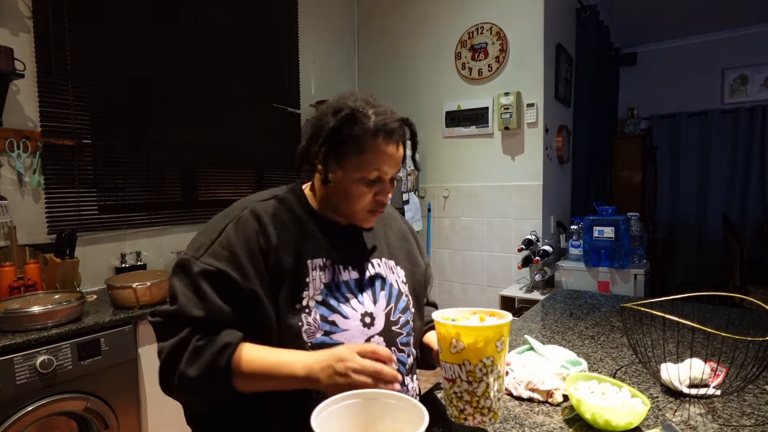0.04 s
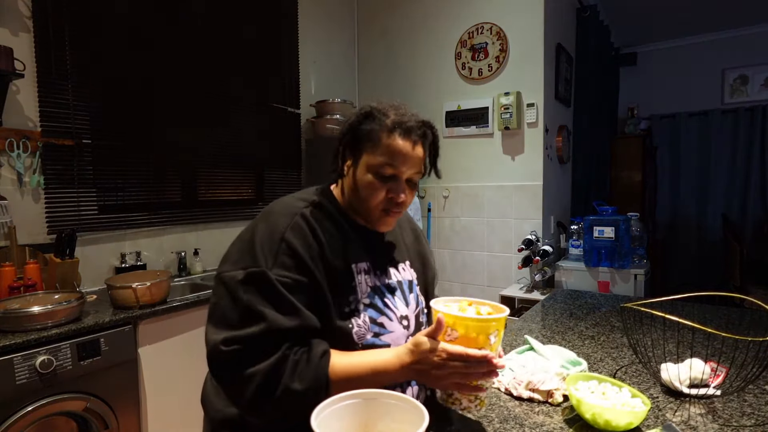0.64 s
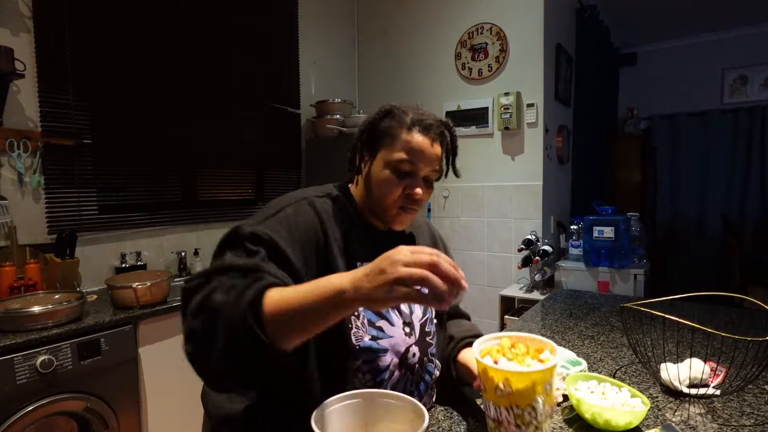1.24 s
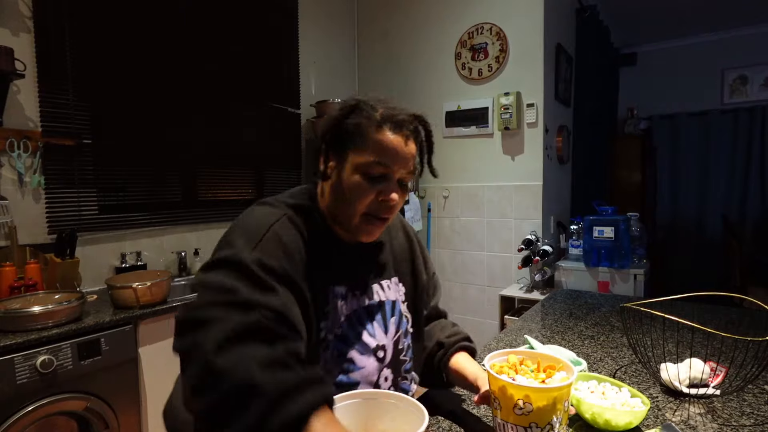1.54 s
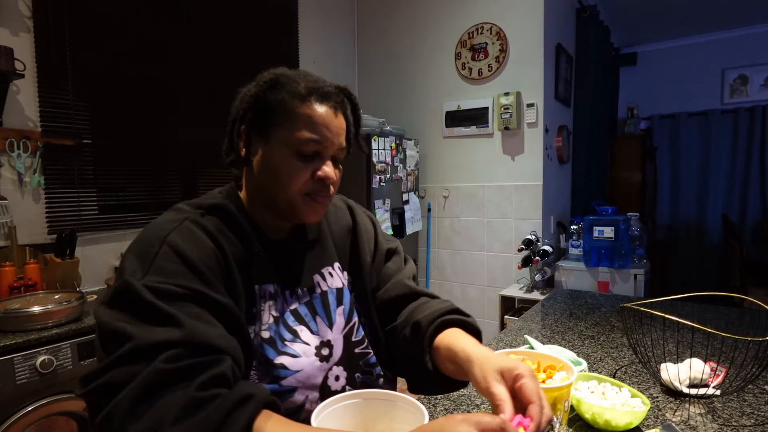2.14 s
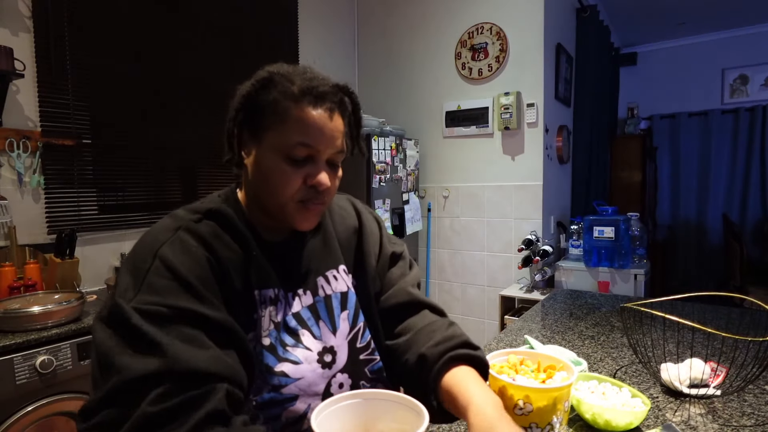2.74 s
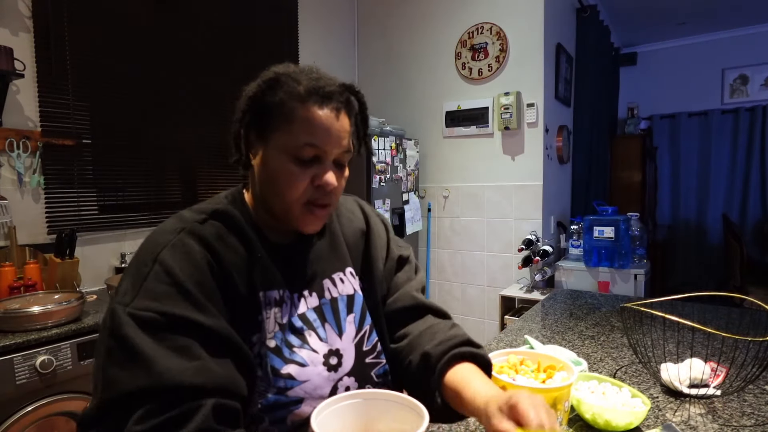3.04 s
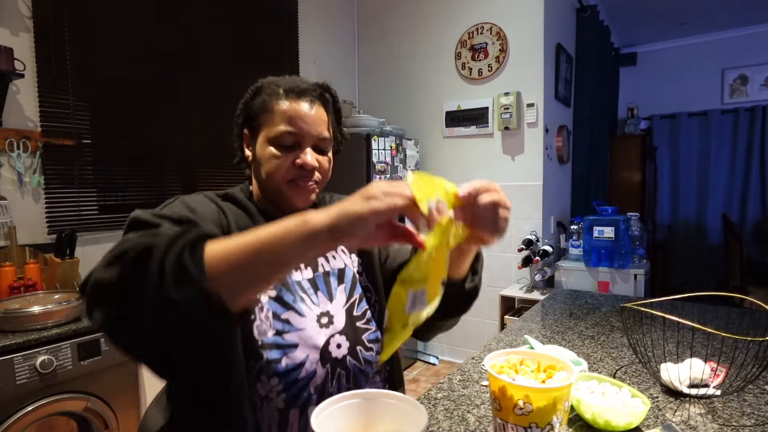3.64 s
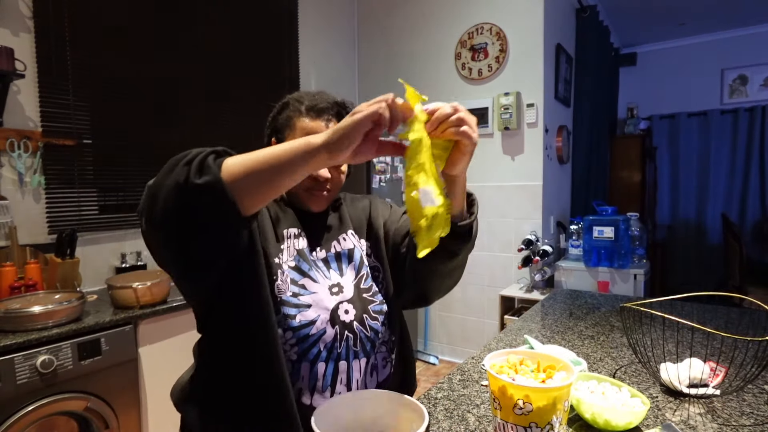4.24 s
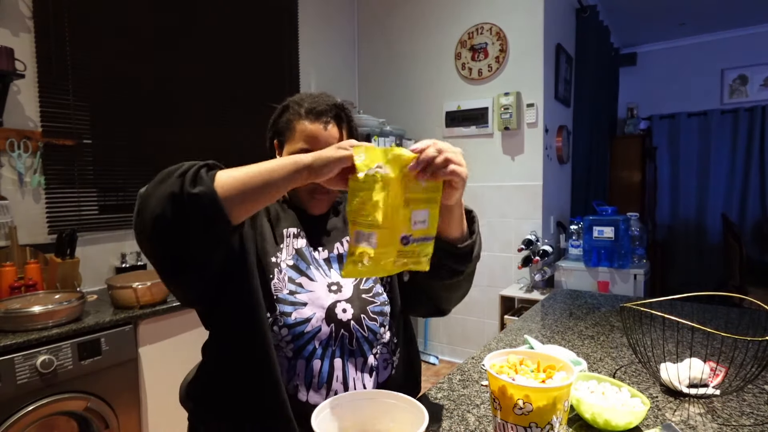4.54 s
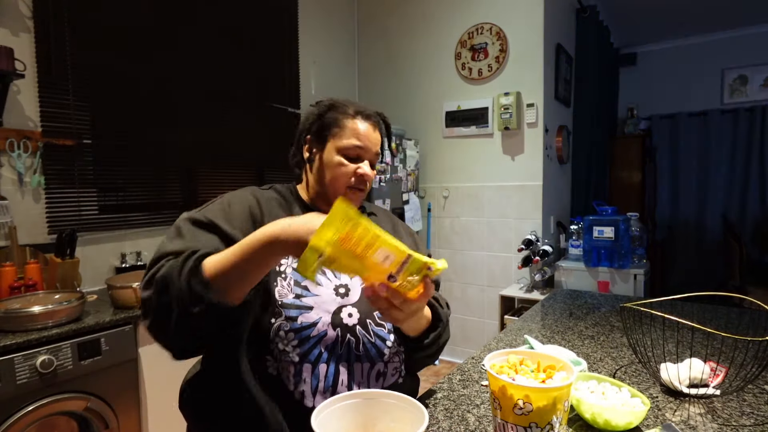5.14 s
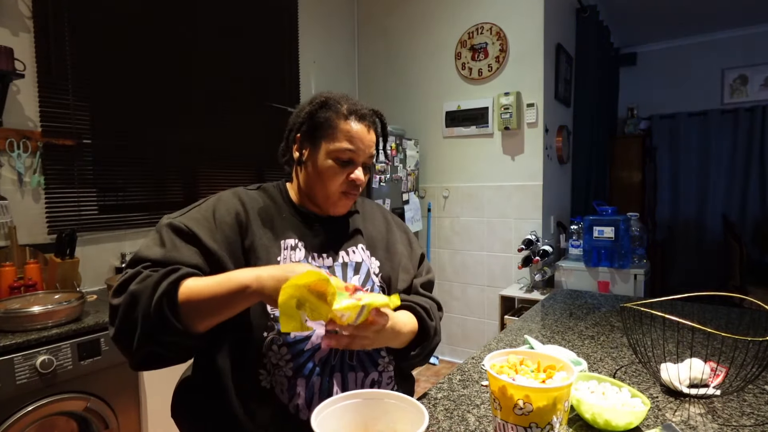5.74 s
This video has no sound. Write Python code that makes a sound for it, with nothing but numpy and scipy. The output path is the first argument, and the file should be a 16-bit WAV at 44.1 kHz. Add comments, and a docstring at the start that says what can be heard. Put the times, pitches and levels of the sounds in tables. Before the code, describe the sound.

Light, crisp pieces rattle against a hollow tub, which then knocks and taps down on a kitchen counter. Hands take up a plastic snack packet: uneven rustling and snapping creases, one more knock on the tub, a brief bright tear, and continued crinkling as the packet is scrunched. The microphone is about an arm's length away in a small, slightly reflective room with faint background air.

```python
"""Kitchen counter, small tiled room: a tub of crisp snacks is shaken and set down, then plastic
packets are handled and one is torn open and crushed. Film creases buckle in sharp snaps over a fine
crackle; rips are runs of tiny ruptures. Dry pieces shower against the tub; knocks ring its hollow
modes. The room adds reflections, a short tail and faint steady air."""
import sys
import numpy as np
from scipy import signal
from scipy.fft import rfft, irfft
from scipy.io import wavfile

SR = 44100
rng = np.random.default_rng(int(sys.argv[2]) if len(sys.argv) > 2 else 0)


def file_out(sig):
    """Save sig as 16-bit WAV at sys.argv[1]."""
    # one column per channel
    cols = np.atleast_2d(sig).T
    # limit, then scale
    lim = np.clip(cols, -1, 1)
    pcm = np.round(lim * 32767).astype(np.int16)
    wavfile.write(sys.argv[1], SR, pcm)


N = 254898
T = np.arange(N) / SR

# big creases snapping through: (time [s], relative level [dB], pitch [Hz], decay [s])
CREASE_SNAPS = [(1.6629, -9, 3440, 0.0014), (1.81, -5.5, 4500, 0.0014), (1.9645, -9.5, 3860, 0.0042),
                (1.9804, -33, 4360, 0.0036), (2.1951, -13, 3160, 0.0014), (2.3093, -4.5, 4140, 0.0072),
                (2.359, -9, 3140, 0.003), (2.3888, -13, 3270, 0.0016), (2.4189, -3.5, 3180, 0.0016),
                (2.5462, -6, 4700, 0.0017), (2.562, -7, 3270, 0.0042), (2.6368, -1.5, 4900, 0.0033),
                (2.834, -4.5, 4610, 0.0037), (2.86, -6, 4770, 0.002), (2.8664, 1.5, 2900, 0.0072),
                (2.8772, 1.5, 3250, 0.0015), (2.917, -8, 3060, 0.0024), (2.9985, 1.5, 2910, 0.0032),
                (3.0839, 3, 7650, 0.0042), (3.1152, 0, 6980, 0.0024), (3.1277, -18, 4560, 0.0029),
                (3.1845, -2, 4840, 0.0038), (3.3097, -5, 4800, 0.0015), (3.3489, -8.5, 3570, 0.0012),
                (3.4062, -3, 3430, 0.0024), (3.4452, -6, 7000, 0.0021), (3.4677, -5.5, 3650, 0.0024),
                (3.4946, -8, 3800, 0.0024), (3.717, -10.5, 4750, 0.0024), (3.7368, -6.5, 4150, 0.003),
                (3.9011, -3, 6460, 0.0018), (4.0054, -3.5, 5050, 0.0014), (4.0203, -7, 4500, 0.003),
                (4.1775, -16, 4700, 0.0024), (4.2283, -11, 4540, 0.0015), (4.3196, -8.5, 7500, 0.0024),
                (4.3275, -1, 3470, 0.0017), (4.3658, -2, 4560, 0.0018), (4.6098, -13, 3060, 0.0026),
                (4.777, -13, 2900, 0.00097), (4.805, -8, 2920, 0.0008), (4.8894, -6, 3010, 0.0011),
                (4.9764, -4.5, 3270, 0.0008), (5.0533, -2.5, 3900, 0.0011), (5.1172, -1, 3160, 0.0008),
                (5.1254, -6, 4100, 0.0048), (5.142, -7, 3190, 0.0024), (5.3492, 3.5, 3930, 0.0018),
                (5.3841, -2, 3970, 0.0024), (5.415, -8, 4040, 0.003), (5.474, 3, 4040, 0.0018),
                (5.5139, -11.5, 4860, 0.0034), (5.563, -13, 3280, 0.0035), (5.5842, -1.5, 3300, 0.0046),
                (5.6624, -3, 6360, 0.0063), (5.7395, 1.5, 3200, 0.0019)]
# hands pressing the film: (time [s], hold [s], relative level [dB], fine-crease offset [dB])
HAND_GRIPS = [(1.61, 0.079, -45, -9), (1.665, .32, -34.5, -1), (1.72, 0.15, -34, -10),
              (1.815, 0.062, -33, 3), (2.142, 0.51, -39, -25), (2.307, 0.0067, -39, 14),
              (2.548, 0.021, -23, 2), (2.603, .46, -29.5, 4), (2.857, .035, -30, 9), (3.08, 0.16, -35, 4),
              (3.363, 0.33, -37.5, 6), (3.37, 0.16, -37.5, 2), (3.606, 0.029, -36, 3),
              (3.716, 0.12, -33.5, 3), (3.892, 0.0094, -28.5, -1), (3.988, 0.062, -29.5, -1),
              (4.072, .21, -40.5, 8), (4.315, 0.067, -30.5, -1), (4.411, 0.23, -32, -1.5),
              (4.645, .31, -43.5, -13), (4.978, 0.32, -34.5, 7.5), (5.04, 0.096, -34.5, -5),
              (5.122, 0.025, -26, -1), (5.286, 0.25, -31, -2), (5.324, 0.19, -27, 3),
              (5.55, 0.18, -28.5, 2.5), (5.732, 0.05, -26, 8)]
# film ripping or sliding fast: (time [s], level [dB], rise [s], fall [s], pitch [Hz])
FILM_RIPS = [(3.084, -25, 0.0037, 0.051, 7300), (3.112, -22, 0.018, 0.06, 7000),
             (4.638, -22.5, 0.0069, 0.0074, 10000)]
# snacks sliding and landing: (time [s], level [dB], rise [s])
TUB_SHAKES = [(0, -41.5, .001), (0.083, -39, 0.023), (0.191, -36, .0033), (0.239, -29.5, .035),
              (0.471, -37.5, .0026), (0.547, -21, 0.012), (.67, -39, 0.023), (0.732, -25.5, 0.016),
              (0.917, -19.5, 0.011), (1.095, -37.5, 0.022), (1.216, -39.5, 0.0024), (1.359, -31, 0.0084)]
# single pieces on the tub wall: (time [s], level over 1 ms [dB], pitch [Hz], decay [s])
PIECE_HITS = [(.0922, -27, 2570, 0.00059), (.1012, -27.5, 2740, 0.0013), (.2801, -15, 2700, .0019),
              (.5596, -13, 2780, 0.0017), (.5699, -20, 2780, 0.0011), (.5861, -11, 1750, 0.0018),
              (.696, -26, 2780, .00074), (.7567, -14, 2320, .0017), (.9235, -11.5, 2400, 0.0033),
              (.9385, -9.5, 2420, 0.0023)]
# knocks on the tub: (time [s], level over 1 ms [dB], pitch of struck part [Hz], spread [octaves])
TUB_KNOCKS = [(0.344, -15.5, 890, 0.85), (.382, -24.5, 1220, 0.24), (0.4, -33, 900, 0.48),
              (0.4853, -14.5, 1060, 1), (0.505, -16.5, 1170, 0.53), (0.489, -23.5, 207, 0.37),
              (1.3574, -8.5, 450, 0.53), (1.3568, -12.5, 1570, 1.04), (1.377, -13.5, 480, 0.57),
              (1.445, -18, 490, 0.7), (1.4905, -17.5, 3660, 0.83), (1.4943, -8, 3800, 0.28),
              (1.502, -17, 3120, 0.6), (1.504, -25.5, 850, 0.24), (2.7515, -13.5, 845, 0.59),
              (2.861, -20.5, 320, 0.68)]
# tub modes: (frequency [Hz], relative level [dB], t60 [s])
TUB_MODES = [(173, -9, 0.12), (244.6, -8.5, 0.2), (294, -3, 0.074), (396, 0, 0.062), (436.6, -6.5, 0.15),
             (524, 2.5, 0.024), (717, 1, 0.038), (850, 5.5, 0.021), (1174, 6.5, 0.022), (1310, 3, 0.02),
             (1544, 6, 0.018), (1956, 3, 0.034), (2390, 8, 0.013), (2940, 6.5, 0.01), (3810, 20, 0.006)]
# kitchen tail: (frequency [Hz], t60 [s], level [dB])
TAIL_BANDS = [(122, 1, -18), (384, 0.48, -5), (940, 0.59, -11.5), (2940, 0.39, -11), (7840, 0.43, -6.5),
              (14000, 0.22, -7.5)]
# nearby surfaces: (delay [s], level [dB])
REFLECTIONS = [(.0092, -24), (0.0115, -20.5)]

# spectra: (frequency [Hz], gain [dB])
CRACKLE_EQ = [(100, -27), (300, -28), (800, -7.5), (1500, 1.5), (2500, 2.5), (4200, 0.5), (5500, -7),
              (9000, -11), (16000, -39)]
FINE_CREASE_EQ = [(1500, -15), (4000, 11), (7000, 3), (10000, 2.5), (13000, 1), (16000, -2)]
PANEL_EQ = [(40, -29), (100, 1.5), (220, -5), (330, 1), (520, -2), (760, 3.5), (1200, 0.5), (3000, -20.5)]
CRUSHED_EQ = [(100, -8), (450, -3), (900, 2.5), (1600, 1), (3000, -0.5), (8000, -1.5), (15000, 1)]  # smaller panels ring higher
SHOWER_EQ = [(60, -26), (200, -14), (430, -2.5), (900, -3.5), (1800, -0.5), (3000, 1), (4500, -4),
             (7000, -14), (12000, -14), (16000, -20)]
AIR_EQ = [(20, -30), (45, -21), (65, -4), (110, 2), (330, -3), (1100, -0.5), (3000, -4), (6000, -6.5),
          (16000, -18)]
RADIATION_EQ = [(50, -12.0), (300, 3.5)]  # thin film radiates little bass
TUB_SEND_EQ = [(1800, 6.5), (3600, -2.5)]  # rim faces the listener: less treble to the walls
TAIL_SIDE_EQ = [(100, -11), (500, -8.5), (2000, 1), (4500, 4.5), (14000, 0.5)]
AIR_SIDE_EQ = [(100, -10), (2000, -8)]


def packet():
    """Small creases crackle under the hands, panels flex, big creases snap."""
    effort, fine_effort = hands()
    crackle = unit(colour(grains(rate_hz=480, spread_db=1, decay_s=0.0023), CRACKLE_EQ))
    fine = unit(colour(grains(rate_hz=300, spread_db=5.5, decay_s=0.0015), FINE_CREASE_EQ))
    flex = unit(colour(grains(rate_hz=350, spread_db=5.5, decay_s=0.0065), PANEL_EQ))
    strays = stray_creases(rate_hz=120, centre_hz=2850, octaves=0.95, spread_db=21, mean_decay_s=0.0015)
    pops = unit(clicks(strays, ring_ratio=1.12, crack_db=-1.5, crack_share=0.37, crack_ratio=1.48,
                       size=512))
    rustle = effort * (undb(-5.5) * crackle + undb(-3.5) * pops + undb(-12) * flex)
    rustle += fine_effort * undb(-12.5) * fine
    creases = np.vstack([CREASE_SNAPS, second_steps(CREASE_SNAPS)])
    snaps = clicks(creases, ring_ratio=1.22, crack_db=3, crack_share=0.2, crack_ratio=1.77)
    film = colour(rustle + undb(-13) * snaps, RADIATION_EQ)
    crushed = np.interp(T, [4.5, 5.0], [0, 1])
    return (1 - crushed) * film + crushed * colour(film, CRUSHED_EQ)


def hands(attack_s=0.0042, release_s=0.032):
    """Rustle and fine-crease envelopes: film takes load, then relaxes. Grips add in power."""
    power, fine_power = np.zeros((2, N))
    for time_s, hold_s, db, fine_db in HAND_GRIPS:
        attack = np.clip((T - time_s) / attack_s, 0, 1)
        release = np.exp(-np.maximum(T - time_s - hold_s, 0) / release_s)
        grip = undb(db) * attack * release
        power += grip ** 2
        fine_power += (undb(fine_db) * grip) ** 2
    return np.sqrt(power), np.sqrt(fine_power)


def stray_creases(rate_hz, centre_hz, octaves, spread_db, mean_decay_s):
    """Click rows for mid-size creases: random time, level, pitch and decay."""
    moment, softness, pitch, length = rng.random((int(rate_hz * N / SR), 4)).T
    hz = centre_hz * 2 ** (octaves * (2 * pitch - 1))
    return np.column_stack([moment * N / SR, -spread_db * softness, hz, mean_decay_s * (0.5 + length)])


def second_steps(creases, gap_s=0.0018, drop_db=7.5):
    """A big crease yields in two steps; rows for the second: later, weaker, detuned."""
    time_s, db, hz, decay_s = np.transpose(creases)
    wait, detune = rng.random((len(time_s), 2)).T
    later_s = time_s + gap_s * (0.5 + wait)
    return np.column_stack([later_s, db - drop_db, hz * 2 ** (detune - 0.5), decay_s])


def rips():
    """Fast runs of tiny, bright ruptures."""
    out, bins_hz = np.zeros(N), np.fft.rfftfreq(N, 1 / SR)
    ruptures = rfft(grains(rate_hz=2500, spread_db=4, decay_s=0.0004, size=64))
    for time_s, db, rise_s, fall_s, hz in FILM_RIPS:
        tear = unit(irfft(ruptures * bell(bins_hz, hz, octaves=0.79), N))
        out += undb(db) * swell(time_s, rise_s, fall_s) * tear
    return out


def snacks(settle_s=0.048):
    """Each shake throws light, dry pieces against the tub."""
    shower = unit(colour(grains(rate_hz=2200, spread_db=6, decay_s=0.0011), SHOWER_EQ))
    flow = sum(undb(db) * swell(time_s, rise_s, settle_s) for time_s, db, rise_s in TUB_SHAKES)
    hits = clicks(PIECE_HITS, ring_ratio=1.3, crack_db=3, crack_share=0.7, crack_ratio=1.2)
    return flow * shower + hits


def tub():
    """Base blows ring the low modes, rim taps the high ones; each starts with a contact tick."""
    out, t = np.zeros(N), np.arange(512) / SR
    mode_hz, mode_db, t60_s = np.transpose(TUB_MODES)
    polarity = (-1) ** np.arange(len(mode_hz))
    for time_s, db, struck_hz, octaves in TUB_KNOCKS:
        hand_detune = 1 + 0.016 * rng.standard_normal(len(mode_hz))
        gain = undb(mode_db) * bell(mode_hz, struck_hz, octaves) * polarity
        body = ring(mode_hz * hand_detune, gain, t60_s / np.log(1000), contact_s=0.00063)
        add(out, time_s, body, db)
        tick = rng.standard_normal(len(t)) * np.exp(-t / 0.002)
        hardness_db = 7 * np.log2(struck_hz / 3800) - 11
        add(out, time_s, band(tick, struck_hz * 1.3, ratio=1.64), db + hardness_db)
    # small body: weak bass
    return signal.sosfilt(signal.butter(2, 160, "high", fs=SR, output="sos"), out)


def kitchen(send, width=0.45, build_s=0.00079, size=22050):
    """Stereo room return: close reflections plus a diffuse tail."""
    t, bins_hz = np.arange(size) / SR, np.fft.rfftfreq(size, 1 / SR)
    bands_hz, t60s_s, levels_db = np.transpose(TAIL_BANDS)
    noise, tail = rfft(rng.standard_normal((2, size))), 0
    for selector, t60_s, db in zip(np.eye(len(bands_hz)), t60s_s, levels_db):
        weight = np.interp(np.log(bins_hz + 1), np.log(bands_hz), selector)
        fade = np.exp(-np.log(1000) * t / t60_s) * np.minimum(t / build_s, 1)
        tail += undb(db) * irfft(noise * weight, size) * fade / np.linalg.norm(fade)
    mid, side = tail
    for delay_s, db in REFLECTIONS:
        mid[int(delay_s * SR)] += undb(db)
    side = width * colour(side, TAIL_SIDE_EQ)
    return np.array([signal.fftconvolve(send, mid + sign * side)[:N] for sign in (1, -1)])


def room_tone(level_db=-49.5):
    """Faint steady air, near mono in the bass."""
    mid, side = (unit(colour(rng.standard_normal(N), AIR_EQ)) for _ in range(2))
    side = colour(side, AIR_SIDE_EQ)
    return undb(level_db) * np.array([mid + side, mid - side])


def clicks(rows, ring_ratio, crack_db, crack_share, crack_ratio, size=1024):
    """Per row: a damped flutter plus a crack with crack_share of its decay time."""
    out, t = np.zeros(N), np.arange(size) / SR
    for time_s, db, hz, decay_s in rows:
        flutter, crack = rng.standard_normal((2, size))
        age = t / decay_s
        flutter = band(flutter * np.exp(-age) * (1 - np.exp(-2 * age)), hz, ring_ratio)
        crack = band(crack * np.exp(-age / crack_share), hz, crack_ratio)
        add(out, time_s, unit(flutter) + undb(crack_db) * unit(crack), db)
    return out


def grains(rate_hz, spread_db, decay_s, size=320):
    """Dense noise ticks of uneven strength; rms 1."""
    noise = rng.standard_normal((int(rate_hz * N / SR), size))
    starts = rng.integers(0, N, len(noise))
    strength = undb(spread_db * np.clip(rng.standard_normal(len(noise)), -2, 2))
    ticks = noise * strength[:, None] * np.exp(-np.arange(size) / SR / decay_s)
    indices = starts[:, None] + np.arange(size)
    return unit(np.bincount(indices.ravel(), ticks.ravel(), N)[:N])


def ring(hz, gain, decay_s, contact_s, size=8192):
    """Damped sines that build up during contact."""
    t = np.arange(size) / SR
    modes = np.exp(-t / decay_s[:, None]) * np.sin(2 * np.pi * hz[:, None] * t)
    return gain @ modes * (1 - np.exp(-t / contact_s))


def swell(time_s, rise_s, fall_s):
    """Linear rise, exponential fall."""
    return np.clip((T - time_s) / rise_s, 0, 1) * np.exp(-np.maximum(T - time_s - rise_s, 0) / fall_s)


def add(track, time_s, sound, db):
    """Mix in a sound with the energy of db held for 1 ms."""
    start = max(int(time_s * SR), 0)
    sound = sound * undb(db) * np.sqrt(SR * 1e-3 / np.sum(sound ** 2))
    track[start:start + len(sound)] += sound[:max(N - start, 0)]


def band(x, hz, ratio):
    """Two-pole band-pass, hz / ratio to hz * ratio."""
    low, high = np.tan(np.pi * np.clip([hz / ratio, hz * ratio], 50, 19000) / SR)
    width, centre = high - low, low * high
    return signal.lfilter([width, 0, -width], [1 + width + centre, 2 * (centre - 1), 1 - width + centre], x)


def colour(x, eq):
    """Filter by a (frequency [Hz], gain [dB]) curve."""
    hz, db = np.transpose(eq)
    bins_hz = np.maximum(np.fft.rfftfreq(len(x), 1 / SR), 1)
    return irfft(rfft(x) * undb(np.interp(np.log(bins_hz), np.log(hz), db)), len(x))


def bell(hz, centre_hz, octaves):
    """Gaussian on the octave scale."""
    return np.exp(-0.5 * (np.log2(np.maximum(hz, 1) / centre_hz) / octaves) ** 2)


def unit(x):
    """Scale to rms 1."""
    return x / np.sqrt(np.mean(x ** 2) + 1e-18)


def undb(db):
    """dB to gain."""
    return 10 ** (np.asarray(db) / 20)


def scene():
    """Sources at arm's length, slightly right, drifting to centre."""
    crisp = packet() + rips() + snacks()
    knocks = tub()
    reverb = kitchen(crisp + colour(knocks, TUB_SEND_EQ))
    pan_db = np.interp(T, [1.2, 3.7, 5.6], [-0.9, -1.0, 0.1])
    return (crisp + knocks + reverb) * undb([pan_db / 2, -pan_db / 2]) + room_tone()


def record(dry):
    """Soft clip, then 15.9 kHz low-pass."""
    return signal.sosfilt(signal.ellip(10, 0.2, 70, 15900, fs=SR, output="sos"), np.tanh(dry))


dry = scene()
out = record(dry)
file_out(out)
```